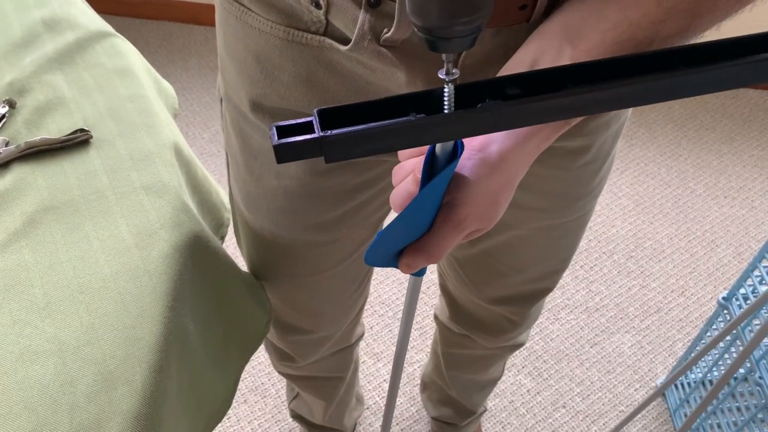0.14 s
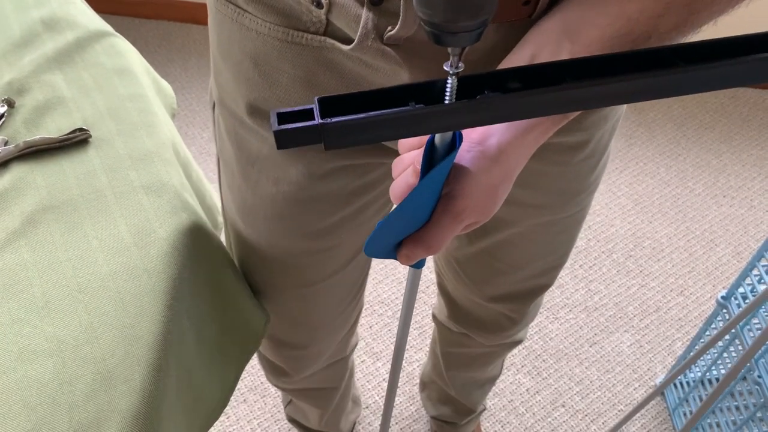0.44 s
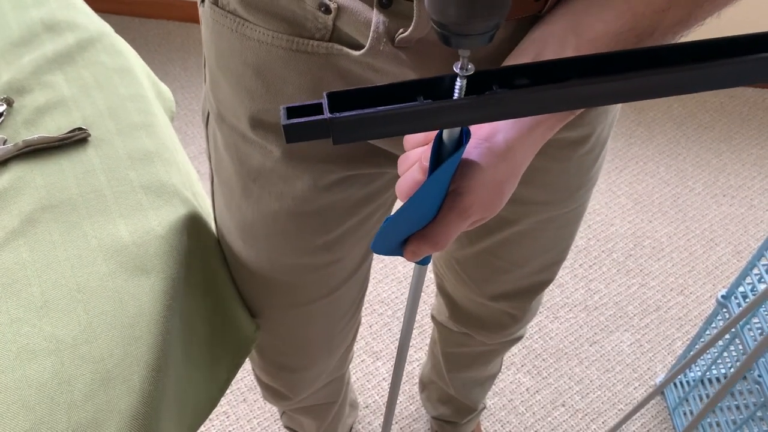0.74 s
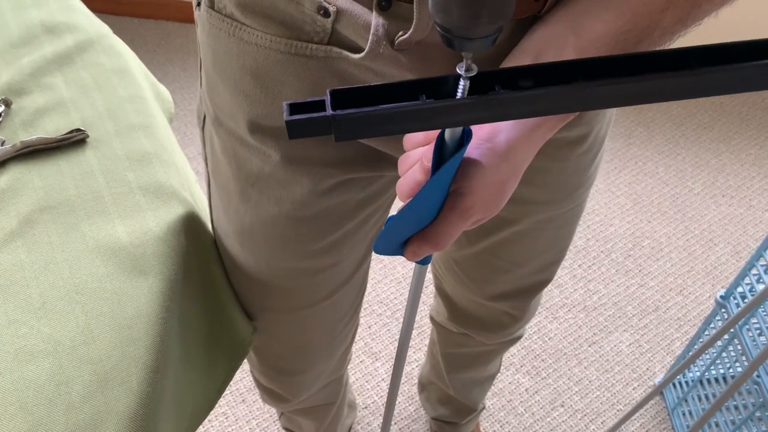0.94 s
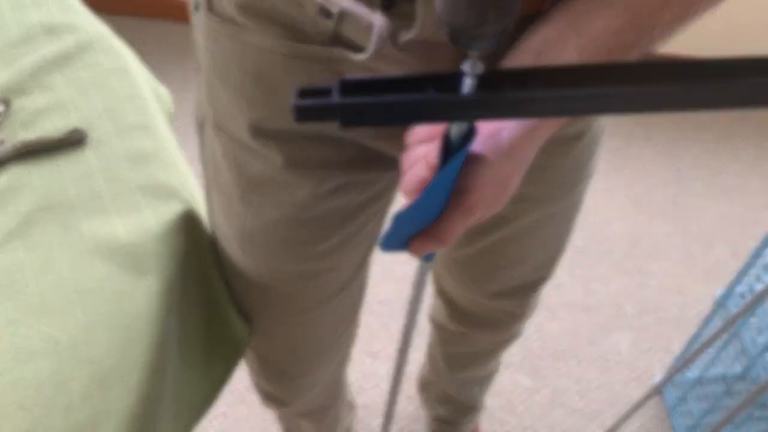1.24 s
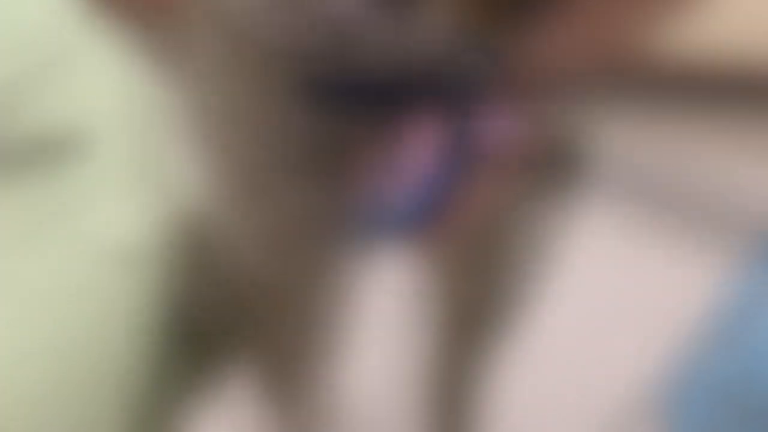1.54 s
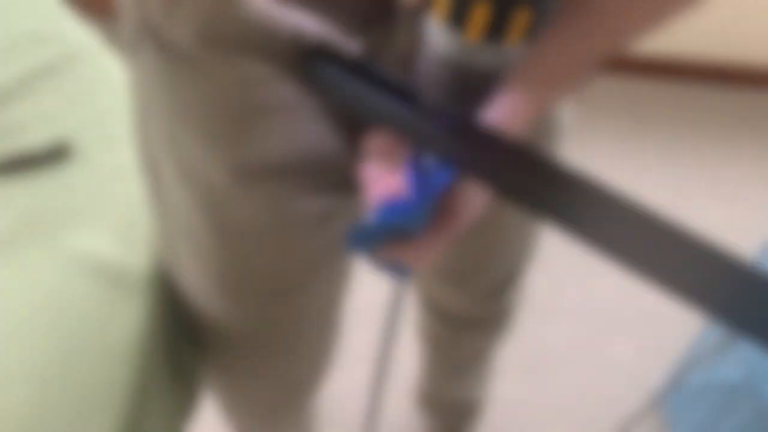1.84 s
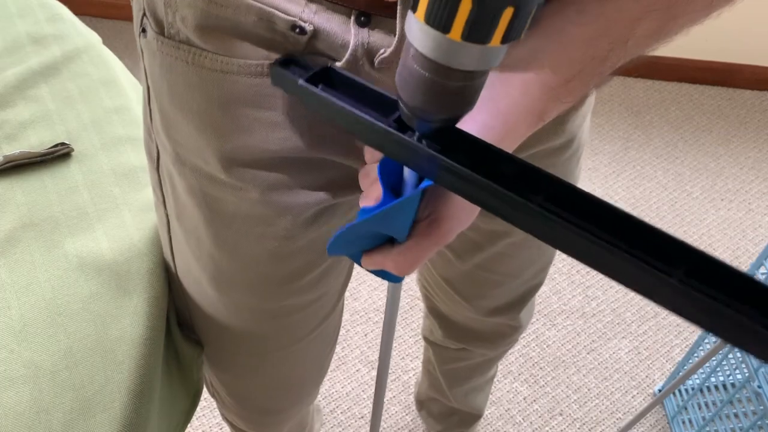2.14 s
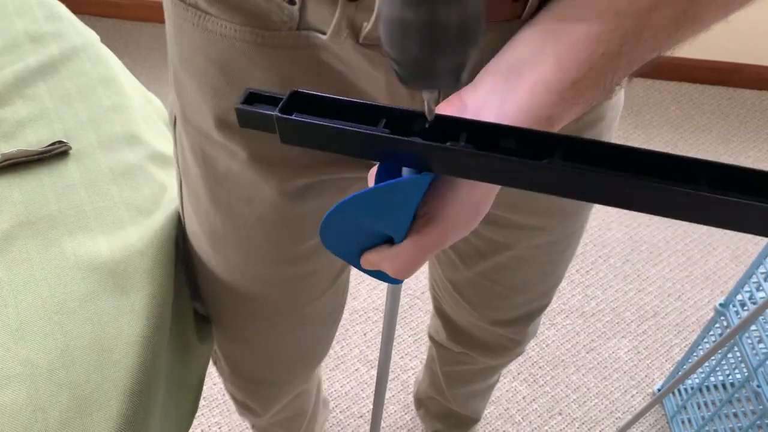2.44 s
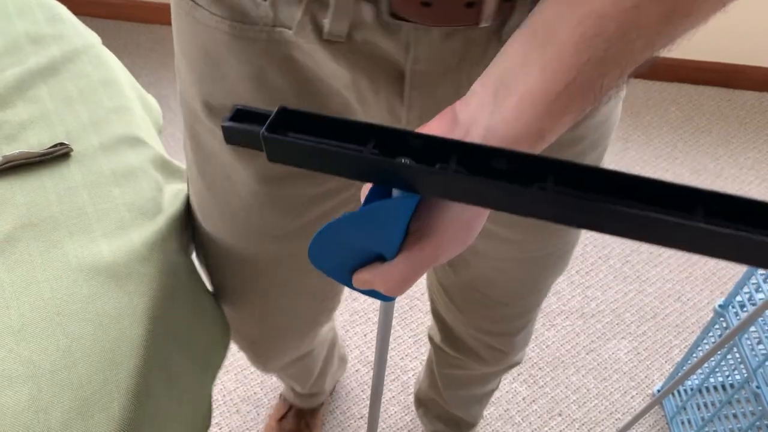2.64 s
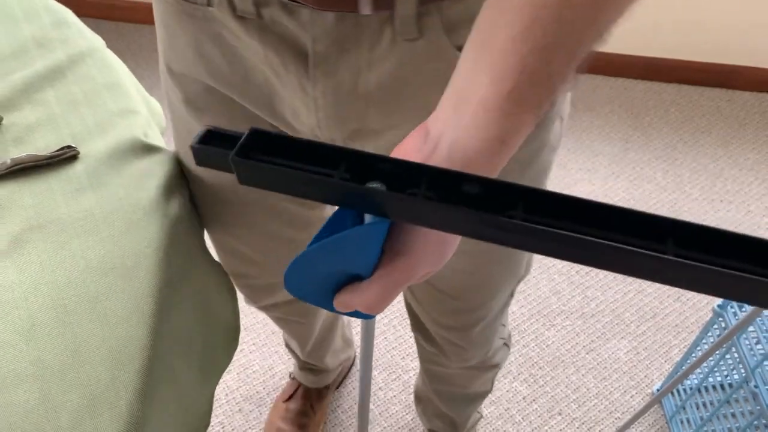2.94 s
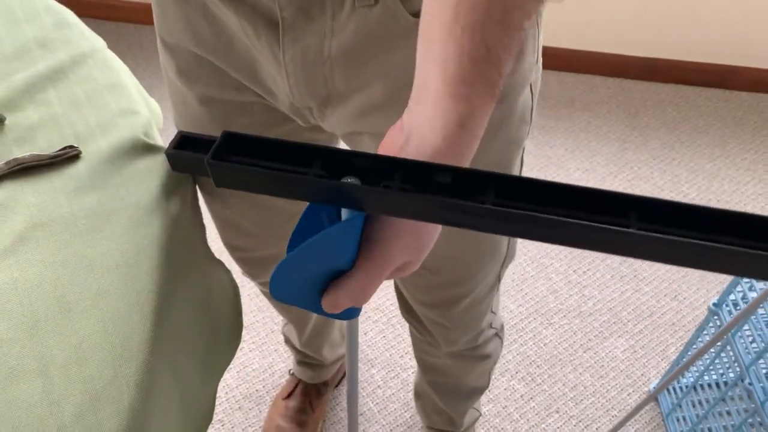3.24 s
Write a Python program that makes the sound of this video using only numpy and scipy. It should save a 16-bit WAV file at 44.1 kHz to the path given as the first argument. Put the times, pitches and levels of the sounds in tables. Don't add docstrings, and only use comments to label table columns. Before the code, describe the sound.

Close, dry indoor sound of a cordless drill: low-speed rattling whine, quick pitch rise, steady loud run, hollow tube knocks and hard bit slips, sudden brake, then gear ticks, a metallic snap, and quiet handling over faint hum.

```python
import sys
import numpy as np
from scipy import signal
from scipy.fft import rfft, irfft
from scipy.io import wavfile
from scipy.ndimage import uniform_filter1d

SR = 44100
rng = np.random.default_rng(int(sys.argv[2]) if len(sys.argv) > 2 else 0)


def boost_factor(decibels):
    exponent = np.asarray(decibels, float) / 20
    return 10 ** exponent


def generate_wav(signal):
    frames = np.transpose(np.atleast_2d(signal))
    scaled = np.clip(frames, -1, 1) * 32767
    pcm = np.round(scaled).astype(np.int16)
    wavfile.write(sys.argv[1], SR, pcm)


N = 149940


def level(x, db):
    return x * boost_factor(db) / np.sqrt(np.mean(x ** 2))


def band(x, hz, width_hz):
    b, a = signal.iirpeak(min(hz, 17000), hz / width_hz, fs=SR)
    return signal.lfilter(b, a, x)


def body(x, table):
    return sum((-1) ** k * boost_factor(db) * band(x, hz, width_hz) for k, (hz, width_hz, db) in enumerate(table))


def coloured(x, points):
    point_hz, point_db = np.array(points).T
    hz = np.fft.rfftfreq(N, 1 / SR) + 1
    return irfft(rfft(x) * boost_factor(np.interp(np.log(hz), np.log(point_hz), point_db)), N)


def walk(rate_hz):
    hold = int(SR / rate_hz)
    steps = np.repeat(rng.standard_normal(N // hold + 1), hold)
    smooth = uniform_filter1d(uniform_filter1d(steps, hold), hold)[:N]
    return smooth / smooth.std()


def hit(start_s, peak_db, length_s, table):
    t = np.arange(6000) / SR
    ring = body(rng.standard_normal(len(t)) * np.exp(-(t / length_s) ** 2), table)
    out = np.zeros(N + len(t))
    i = int(start_s * SR)
    out[i:i + len(t)] = ring * boost_factor(peak_db) / np.abs(ring).max()
    return out[:N]


# start_s, mesh_hz
MESH_CURVE = [(0, 1790), (.11, 1818), (.4, 1860), (.47, 1960), (.515, 2520), (.55, 2930), (.6, 3310),
              (.68, 3375), (.84, 3320), (1.05, 3288), (1.26, 3270), (1.47, 3247), (1.8, 3240), (1.9, 3130),
              (2.04, 3050)]
# start_s, rattle_db
EFFORT_CURVE = [(0, -35), (.4, -34), (0.46, -35), (.53, -28), (.6, -26.5), (0.949, -25), (1.459, -25.5),
                (1.53, -26.5), (1.73, -24.5), (1.762, -27.5), (1.781, -31), (1.8, -28), (1.83, -22),
                (1.9, -24.5), (1.92, -30), (1.951, -21.5), (2.021, -30), (2.04, -29)]
# start_s, load_0_to_1
LOAD_CURVE = [
    (1.46, 0),
    (1.53, .6),
    (1.68, 1),
]
# hz, width_hz, slow_db, fast_db, loaded_db
HOUSING = [(560, 36, -26, -26, -9.5), (916, 320, -9.5, -16.5, -11.5), (1326, 230, 1, -4, -0.5),
           (1724, 402, -3, -6.5, -2), (2815, 430, -2, -5.5, -1), (3063, 260, 2.5, -1, 1.5),
           (3512, 517, 0, -5.5, -4.5), (4670, 600, -9, -12, -8.5), (5520, 430, -9.5, -9, -3.5),
           (6546, 447, -6, -7, -2.5), (7893, 280, -0.5, -3.5, 2), (10620, 760, -18.5, -20.5, -8.5),
           (12300, 1200, -13, -17, -11.5), (15300, 750, -13, -13, -7)]
# hz, level_db
RATTLE_BED = [(300, -25), (1000, -15.5), (3000, -25), (5100, -26), (7000, -34.5), (9200, -22), (13500, -23),
              (16000, -42)]
WHINE_ORDERS = [.252, .408, .506, .812, .876, 1, 1.033, 1.525, 1.733, 1.98]
# slow_db, fast_db, loaded_db
WHINE_LEVELS = [(-66, -51, -53), (-62, -44, -46), (-60, -39, -43), (-70, -54, -33), (-66, -45, -54),
                (-43, -38, -43), (-54, -42, -52), (-45, -56, -58), (-48, -62, -62), (-42, -54, -54)]
SLOW_HZ, FAST_HZ = 1950, 2700
TEETH_PER_TURN, TURN_DEPTH, SPEED_WANDER, WHINE_FLICKER_DB = 42, .6, .003, 2
SCATTER_DB, SCATTER_CAP, RATTLE_TURN_DB, RATTLE_FLICKER_DB = 3, 3.5, 1, 0.5
DEAD_HZ, DEAD_WIDTH_HZ, DEAD_DB = 2270, 210, -16
STALL_START_S, STALL_END_S, STALL_DB = 1.93, 1.97, -12
STOP_S, STOP_FADE_S, COAST_DB, COAST_T60_S = 2.045, .001, -14, .33


def drill(t):
    mesh_hz, effort_db, load = (np.interp(t, *np.array(curve, float).T)
                                for curve in (MESH_CURVE, EFFORT_CURVE, LOAD_CURVE))
    fast = np.clip((mesh_hz - SLOW_HZ) / (FAST_HZ - SLOW_HZ), 0, 1)

    def state_gain(slow_db, fast_db, loaded_db):
        return boost_factor((slow_db + (fast_db - slow_db) * fast) * (1 - load) + loaded_db * load)

    phase = 2 * np.pi * np.cumsum(mesh_hz * (1 + SPEED_WANDER * walk(60))) / SR
    turn = phase / TEETH_PER_TURN

    scatter = np.minimum(rng.exponential(size=N), SCATTER_CAP)
    teeth = rng.standard_normal(N) * boost_factor(SCATTER_DB * scatter)
    teeth = level(teeth * boost_factor(RATTLE_TURN_DB * np.cos(turn) + RATTLE_FLICKER_DB * walk(70)), 0)
    rattle = coloured(teeth[::-1], RATTLE_BED)
    for k, (hz, width_hz, *state_db) in enumerate(HOUSING):
        ring = band(teeth, hz, width_hz) * boost_factor(0.59 * walk(22))
        rattle = rattle + (-1) ** k * state_gain(*state_db) * ring

    whine = 0
    for k, (order, state_db) in enumerate(zip(WHINE_ORDERS, WHINE_LEVELS)):
        dead_db = DEAD_DB * np.exp(-((order * mesh_hz - DEAD_HZ) / DEAD_WIDTH_HZ) ** 2)
        gain = state_gain(*state_db) * boost_factor(WHINE_FLICKER_DB * walk(30) + dead_db)
        throb = 1 + TURN_DEPTH * np.cos(turn + k) + TURN_DEPTH * np.cos(2 * turn + k * k)
        whine = whine + gain * np.sin(order * phase) * throb

    after_s = np.maximum(t - STOP_S, 0)
    running = np.exp(-after_s / STOP_FADE_S)
    coast = boost_factor(COAST_DB - 60 * after_s / COAST_T60_S)
    stall = boost_factor(np.interp(t, (STALL_START_S, STALL_END_S), (0, STALL_DB)))
    return level(rattle, 0) * boost_factor(effort_db) * np.maximum(running, coast) + whine * running * stall


# hz, wobble_width_hz, level_db
HUM = [(121.4, 6.4, -48.5), (241.4, 24, -64), (343, 10, -77)]
# hz, level_db
ROOM_TONE = [(20, -13.5), (60, -10.5), (150, -19.5), (400, -26), (530, -34), (2000, -40.5), (6000, -48.5),
             (15500, -61.5)]
ROOM_TONE_DB, HUM_WOBBLE = -57.5, .25
RUSTLE_S, RUSTLE_SPREAD_S, RUSTLE_DB, RUSTLE_HZ, RUSTLE_WIDTH_HZ = 2.63, 0.49, -68, 1100, 2100


def ambience(t):
    hum = 0
    for hz, width_hz, db in HUM:
        wobble = level(band(rng.standard_normal(N), hz, width_hz), 0)
        hum = hum + boost_factor(db) * (1.1 * np.sin(2 * np.pi * hz * t) + HUM_WOBBLE * wobble)
    tone = level(coloured(rng.standard_normal(N), ROOM_TONE), ROOM_TONE_DB) * boost_factor(0.9 * walk(2))
    grain = rng.standard_normal(N) * boost_factor(1.5 * rng.exponential(size=N) + 1.5 * walk(24))
    passing = np.exp(-((t - RUSTLE_S) / RUSTLE_SPREAD_S) ** 2)
    rustle = level(band(grain, RUSTLE_HZ, RUSTLE_WIDTH_HZ), RUSTLE_DB) * passing
    return hum + tone + rustle


# start_s, level_db, swell_s, brightness_db, grip_damping_hz
JOLTS = [(1.46, -40.5, 0.021, 1, 12), (1.491, -28.5, 0.022, 4, 9), (1.52, -33.5, .03, 7.5, 16),
         (1.735, -30, 0.022, -2.5, 8), (1.777, -21.5, 0.022, 4.5, 9), (1.809, -23, .025, 5, 16),
         (1.851, -26, .02, 6, 10), (1.9, -22, .012, -2.5, 9), (1.927, -21, 0.031, -7.5, 6),
         (1.6, -45.5, 0.042, 13, 16), (1.7, -46.5, 0.015, 8, 16)]
# hz, width_hz, level_db
BENDING_MODES = [(90, 19, 2.5), (121, 18, 2.5), (176, 26, -1.5), (252, 30, -9), (323, 30, -13.5)]
SWAY_HZ, STIFFEN_HZ_PER_HZ = 54, 1.9


def tube_jolts(t):
    out = 0
    for start_s, db, swell_s, bright_db, grip_hz in JOLTS:
        u = np.maximum(t - start_s, 0) / swell_s
        push = u * np.exp(-u * u)
        hz = SWAY_HZ + STIFFEN_HZ_PER_HZ * grip_hz
        sway = band(push * np.sin(2 * np.pi * hz * t), hz, grip_hz)
        shake = body(push * rng.standard_normal(N), BENDING_MODES)
        shake = boost_factor(bright_db - 3.5) * shake / np.abs(shake).max()
        out = out + boost_factor(db) * (sway / np.abs(sway).max() + shake)
    return out


# start_s, peak_db, length_s, deep_0_to_1
THUDS = [(1.478, -29.5, 0.0073, .5), (1.51, -34, 0.026, 0.86), (1.608, -43.5, .006, 0.5),
         (1.634, -37.5, 0.0043, 0.14), (1.712, -31, 0.017, 0.6), (1.772, -24, 0.0033, 0.37),
         (1.8, -27.5, 0.013, 0.36), (1.874, -26, 0.0053, 0.5), (1.924, -23, 0.0056, 0.4),
         (1.955, -33.5, 0.034, 0.95), (1.99, -30, 0.018, 0.54), (2.02, -30, 0.0093, 0.54)]
# hz, width_hz, level_db
TUBE_DEEP = [(183, 26, 0), (260, 16, -2.6), (366.5, 14, 0.23)]
# hz, width_hz, level_db
TUBE_HIGH = [(490, 56, -8.5), (603, 20, 2), (735, 110, -3), (840, 120, -1.5)]


def tube_knocks():
    return sum(deep * hit(start_s, db, length_s, TUBE_DEEP) + (1 - deep) * hit(start_s, db, length_s, TUBE_HIGH)
               for start_s, db, length_s, deep in THUDS)


# start_s, peak_db, dull_0_to_1, length_s
SLIPS = [
    (1.49, -24, .6, .002),
    (1.7737, -7.5, .85, .0018),
    (1.788, -12, .1, .0015),
    (1.793, -10, 0, .0012),
    (1.812, -14, .3, .002),
    (1.8855, -15, .1, .002),
    (1.9258, -6, .85, .0022),
    (1.942, -7, .2, .0015),
    (1.995, -18, .2, .002),
    (2.0404, -12, .25, .0025),
]
# hz, width_hz, level_db
SLIP_DULL = [(343, 28, -2), (610, 55, -3), (1380, 190, -2.5), (2865, 670, -4)]
# hz, width_hz, level_db
SLIP_BRIGHT = [(1540, 230, 8), (2520, 500, -12), (3940, 510, 0), (6660, 1100, -5), (10200, 1800, -9.5),
               (14100, 4200, -13.5)]


def bit_slips():
    return sum(dull * hit(start_s, db, length_s, SLIP_DULL) + (1 - dull) * hit(start_s, db, length_s, SLIP_BRIGHT)
               for start_s, db, dull, length_s in SLIPS)


# start_s, peak_db
TICKS = [(2.061, -33), (2.1057, -38), (2.125, -40), (2.1431, -37), (2.162, -47), (2.1805, -46),
         (2.214, -52)]
# hz, width_hz, level_db
TICK_BODY = [(1200, 500, -10), (6600, 900, -7), (7900, 300, 3), (3600, 500, -9), (12500, 1500, -14),
             (15000, 700, -13)]


def gear_ticks():
    return sum(hit(start_s, db, 0.0042, TICK_BODY) for start_s, db in TICKS)


# start_s, peak_db, length_s
BUMPS = [(2.063, -36, 0.006), (2.12, -46.5, 0.051), (2.184, -41.5, 0.0044), (2.202, -43.5, 0.0062),
         (2.272, -39, 0.0066), (2.339, -49, 0.0069), (2.589, -62, 0.0026), (2.615, -48, 0.0063)]
# hz, width_hz, level_db
BUMP_BODY = [(303, 75, 2), (507, 93, 4.5), (1090, 840, -2.5)]


def tube_bumps():
    return sum(hit(start_s, db, length_s, BUMP_BODY) for start_s, db, length_s in BUMPS)


# hz, width_hz, level_db
BIT_BODY = [(1050, 260, -7.5), (3000, 190, 1.5), (3480, 150, 7), (4760, 200, 1.5), (5230, 200, 1.5),
            (6530, 260, -4.5), (7900, 440, -14), (9200, 250, -14), (10800, 550, -18), (12000, 630, -17),
            (14100, 1500, -20)]


def bit_release():
    return hit(2.2713, -21, 0.00022, BIT_BODY)


# start_s, peak_db, length_s
CLICKS = [(2.51, -52, 0.00083), (2.5232, -47, 0.0058), (2.543, -39.5, 0.0021), (2.589, -56, .003),
          (2.617, -63, 0.008), (2.79, -51, 0.00083), (3.1603, -55, 0.0008)]
# hz, width_hz, level_db
CLICK_BODY = [(1276, 850, 2), (2800, 260, 11), (6170, 3100, -8), (10100, 2300, -5.5), (14100, 4200, -10)]


def handling_clicks():
    return sum(hit(start_s, db, length_s, CLICK_BODY) for start_s, db, length_s in CLICKS)


ECHO_S, ECHO_SPREAD_S, ECHO_DB = .012, 0.00064, -10
TAIL_START_S, TAIL_DB, TAIL_T60_S, TAIL_TOP_HZ, TOP_T60_S = .003, -16.5, 0.41, 7940, .25


def room(x):
    t = np.arange(SR // 2) / SR
    noise = rng.standard_normal(len(t))
    b, a = signal.butter(2, TAIL_TOP_HZ, fs=SR)
    soft = signal.lfilter(b, a, noise)
    tail = soft + (noise - soft) * boost_factor(-60 * t / TOP_T60_S)
    tail = tail * boost_factor(-60 * t / TAIL_T60_S) * (t > TAIL_START_S)
    tail = tail * boost_factor(TAIL_DB) / np.sqrt(np.sum(tail ** 2))
    echo = noise * np.exp(-((t - ECHO_S) / ECHO_SPREAD_S) ** 2)
    echo = boost_factor(ECHO_DB) * signal.lfilter(b, a, echo) / 8
    return x + signal.fftconvolve(x, echo + tail)[:N]


def scene():
    t = np.arange(N) / SR
    in_room = drill(t) + bit_slips() + gear_ticks() + tube_bumps() + bit_release() + handling_clicks()
    mono = room(in_room) + tube_jolts(t) + tube_knocks() + ambience(t)
    return np.array([mono, mono])


def roll_off(x):
    return signal.sosfilt(signal.butter(12, 16820, fs=SR, output="sos"), x)


DUCK_AT_DB, DUCK_RATIO, DUCK_RELEASE_S, TOP_HZ = -26, 1.82, 0.38, 15800


def record(dry):
    keep = np.exp(-1 / (DUCK_RELEASE_S * SR))
    loud = np.sqrt(signal.lfilter([1 - keep], [1, -keep], dry[0] ** 2) + 1e-12)
    gain = np.minimum(1, boost_factor(DUCK_AT_DB) / loud) ** (1 - 1 / DUCK_RATIO)
    lowpass = signal.ellip(10, .2, 80, TOP_HZ, fs=SR, output="sos")
    return roll_off(signal.sosfilt(lowpass, dry) * gain)


dry = scene()
out = record(dry)
generate_wav(out)
```